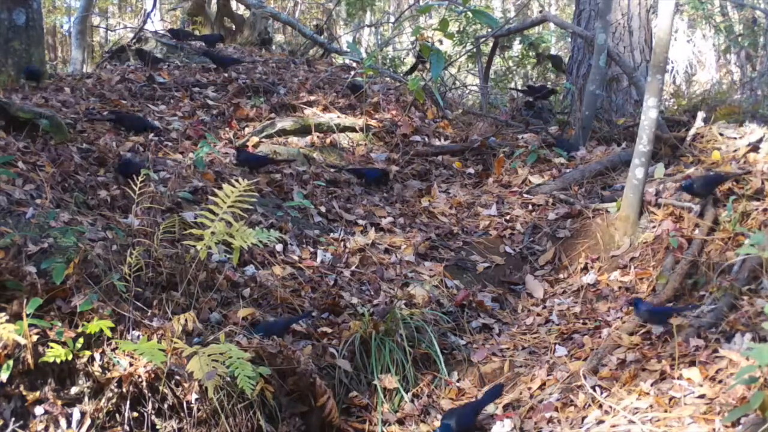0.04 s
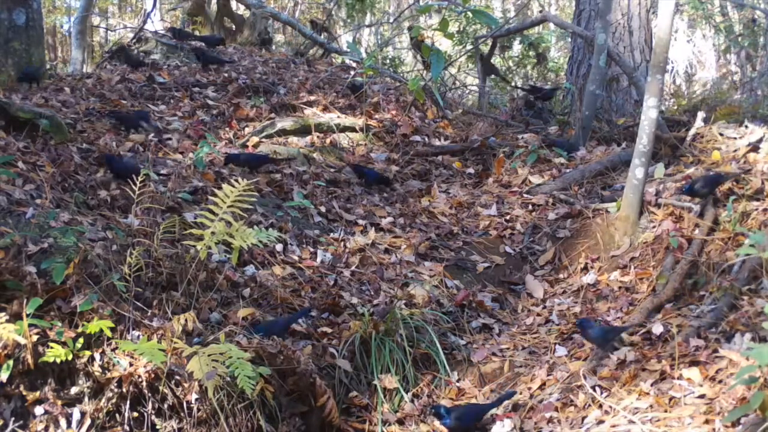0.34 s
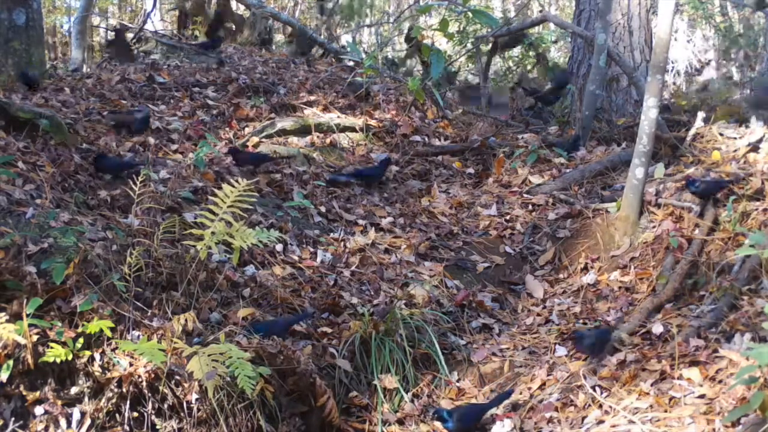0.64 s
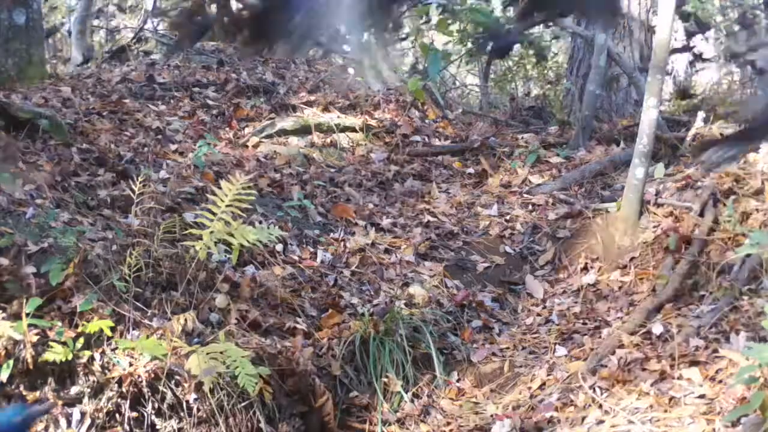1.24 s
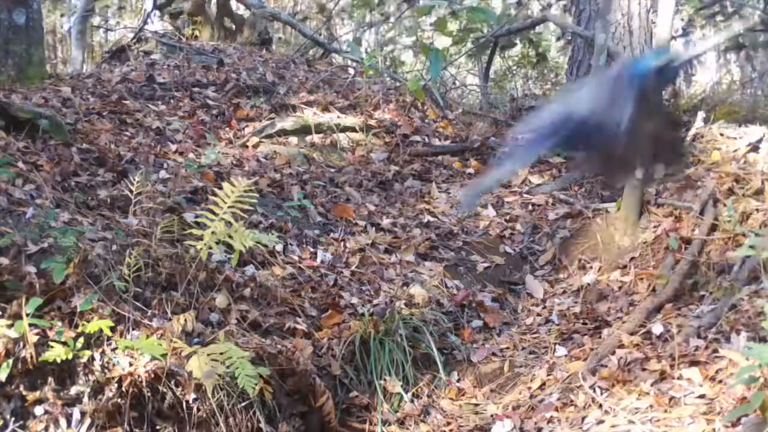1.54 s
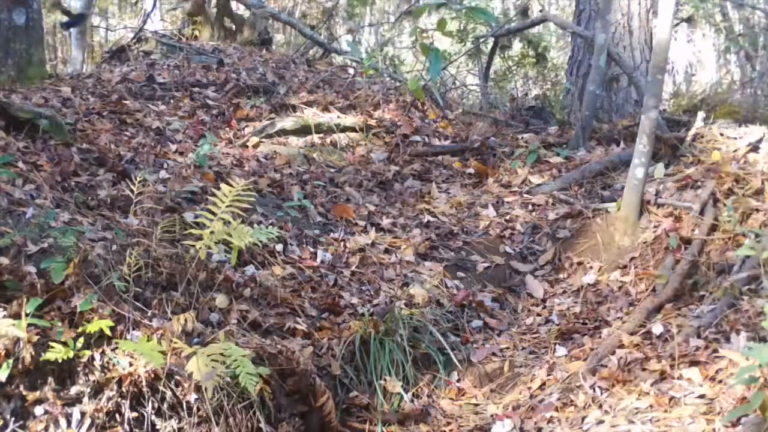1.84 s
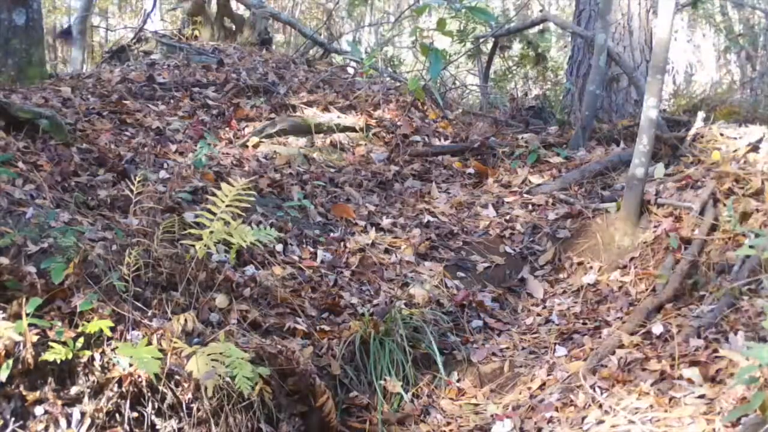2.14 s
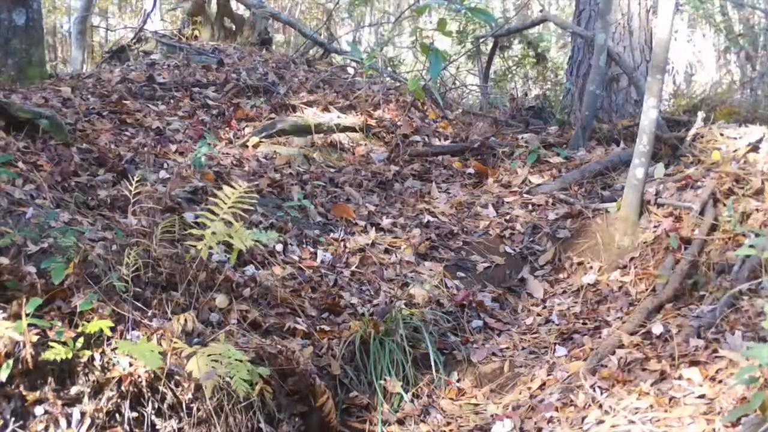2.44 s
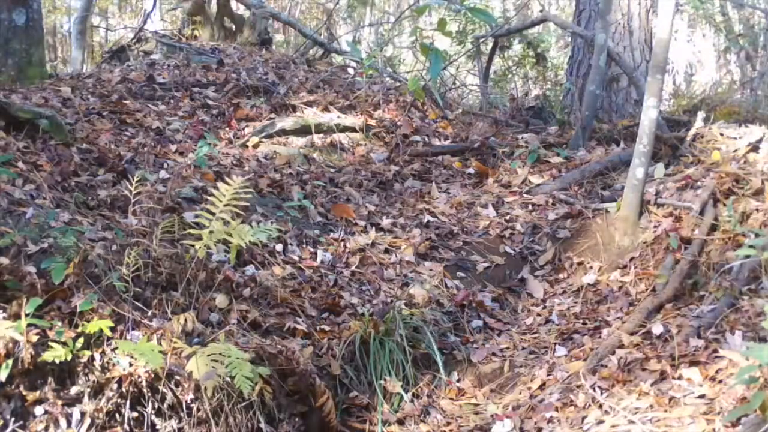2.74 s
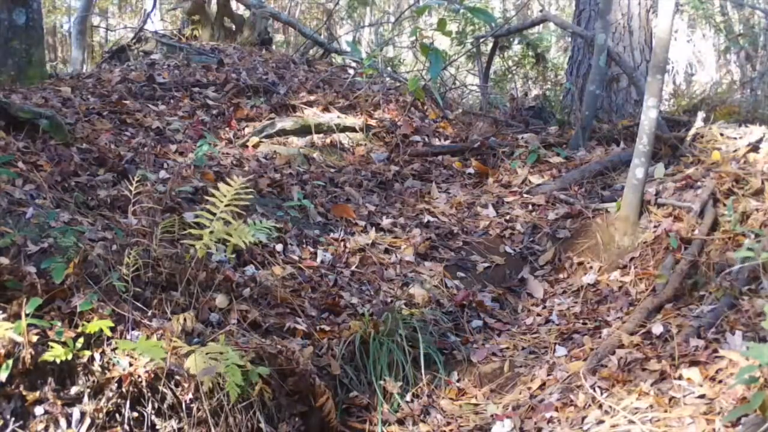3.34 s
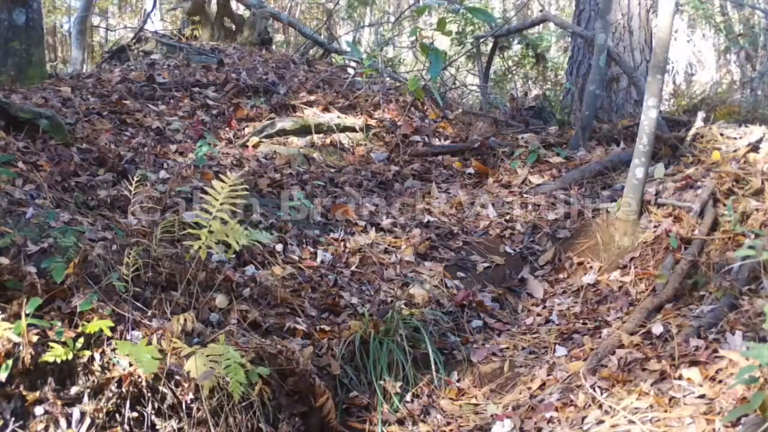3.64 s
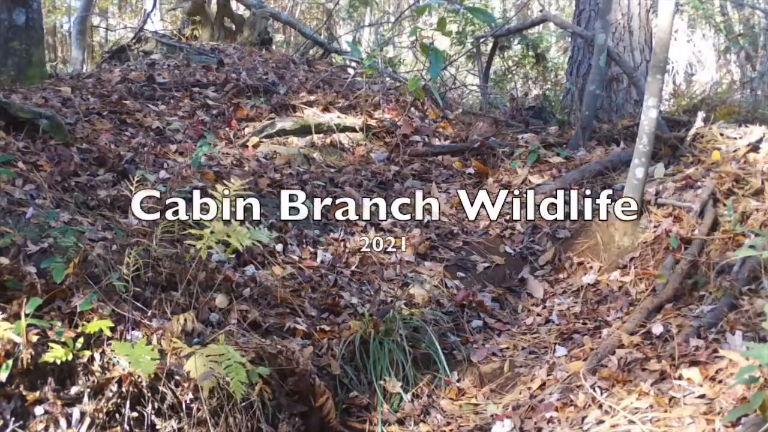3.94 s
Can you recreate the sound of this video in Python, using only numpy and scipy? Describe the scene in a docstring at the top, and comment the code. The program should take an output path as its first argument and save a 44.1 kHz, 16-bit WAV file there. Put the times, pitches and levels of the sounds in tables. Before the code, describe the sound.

A flock of birds rustles through dry leaves, then takes off in a flurry of wingbeats.

```python
"""Dry leaves rustle and crunch under a foraging flock of grackles, which then takes off all at once.
The rustle is thousands of tiny leaf cracks a second, swelling into a flurry as the birds spring up.
Wingbeats pulse the air into a whirr and a swish, a few thump past close by, and the flock recedes
into the trees. Thin whistles and two harsh chucks cut through; the wooded slope adds a short tail
to calls, crunches and ticks, over a bed of still air. Heard in mono."""
import sys
import numpy as np
from scipy import signal
from scipy.fft import rfft, irfft
from scipy.io import wavfile

SR = 44100
rng = np.random.default_rng(int(sys.argv[2]) if len(sys.argv) > 2 else 0)


def wav_out(sig):
    """Save sig, one row per channel (or a flat mono array), as 16-bit PCM at SR to the path in sys.argv[1]."""
    wavfile.write(sys.argv[1], SR, np.round(np.clip(np.atleast_2d(sig).T, -1, 1) * 32767).astype(np.int16))


N = 176400
TIME = np.arange(N) / SR

# stirring of the leaf litter: time_s, relative_db
RUSTLE_FADER = [(0, -38), (.4, -38.5), (.5, -36), (.64, -35.5), (.725, -37.5), (.9, -33.5), (1.08, -30),
                (1.14, -33.5), (1.36, -34.5), (1.42, -36.5), (1.65, -40.5), (1.85, -39), (2.05, -44),
                (2.45, -44), (2.7, -43), (3.1, -46), (3.6, -44), (3.75, -47.5), (4, -47)]
# tone of dry leaves: frequency_hz, gain_db
RUSTLE_EQ = [(900, -29), (2000, -22.5), (3300, -9.5), (3950, -11), (4500, -7), (5250, 0), (5750, 2),
             (7200, -5.5), (9000, -11), (11300, -18.5), (13500, -30), (15700, -36)]
# broader crackle of flung leaves: frequency_hz, gain_db
FLURRY_EQ = [(1200, -31), (2300, -14), (3100, -8), (4000, -1.5), (5200, -2), (6800, 3.5), (9000, -6),
             (11500, -12), (13500, -20.5), (15700, -27)]
# single leaves crunched or slapped by a wing: peak_s, relative_db, decay_s, pitch_hz
CRUNCH_CUES = [(.197, -39, .004, 8000), (0.46, -34, 0.0044, 5600), (0.467, -45, .003, 12900),
               (.509, -32, 0.0068, 5570), (0.642, -33, .004, 6200), (0.691, -34, 0.0043, 6200),
               (0.749, -31, 0.0026, 5730), (0.76, -40, 0.0087, 3200), (.763, -29.5, 0.0057, 5960),
               (.775, -34, 0.0035, 9600), (1.093, -26.5, 0.0075, 4700), (1.103, -18.5, 0.0024, 3930),
               (1.107, -25, 0.0059, 6700), (1.173, -28.5, 0.0052, 6300), (1.202, -28.5, .004, 4900),
               (1.366, -28, .004, 6000), (1.463, -38, 0.0027, 6250), (1.51, -32.5, .004, 6260),
               (1.911, -37, .005, 6200), (1.952, -38, .002, 5600), (2.139, -39, .004, 6200),
               (2.306, -36, 0.0054, 5350), (2.354, -39, .003, 6900), (2.595, -39, .003, 6150),
               (2.614, -40, .004, 5600), (2.705, -39, 0.0035, 5600), (2.787, -32.5, 0.0049, 5970),
               (2.79, -42, .004, 3450), (3.015, -40, .003, 6700), (3.515, -37, .003, 5640),
               (3.554, -40, .003, 6200)]
# ticking of the nearest leaves, fading as the birds leave: time_s, level_db
TICK_FADER = [(0, -51.5), (.65, -51), (.95, -49.5), (1.3, -48.5), (1.7, -53.5), (2.4, -56.5), (4, -68)]
# resonances of those leaves: pitch_hz, gain_db
LEAF_MODES = [(3400, -6), (4200, -4), (5500, 5), (6200, 4.5), (7000, 1.5), (7900, -1.5), (9000, -3.5),
              (10200, -6.5), (11600, -16), (13200, -15)]
# whirr of the flock's wings: time_s, relative_db
WHIRR_FADER = [(0, -58), (0.18, -60), (0.32, -49.5), (0.45, -53), (0.62, -49), (0.8, -52), (1.08, -40),
               (1.3, -43.5), (1.7, -49.5), (1.95, -49.5), (2.2, -49), (2.5, -53.5), (2.8, -47.5),
               (3.05, -53), (3.6, -52.7), (4, -56.5)]
# low body of the wingbeats: frequency_hz, gain_db
WHIRR_EQ = [(20, -9.5), (45, 0.5), (90, -6), (180, -12), (350, -19), (700, -32.5), (1500, -48)]
# feather swish, lingering as the flock settles in the trees: time_s, relative_db
SWISH_FADER = [(0, -67), (.55, -78), (.78, -55.5), (.95, -50.5), (1.12, -47), (1.3, -50), (1.6, -53.5),
               (2.2, -54.5), (2.8, -55), (3.6, -56.5), (4, -59)]
# tone of feathers: frequency_hz, gain_db
SWISH_EQ = [(150, -10), (500, 1.5), (1200, 0.5), (2200, -6), (3600, -2.5), (6000, -0.5), (12000, -15)]
# air pushed by wings passing close: peak_s, peak_db, pitch_hz
DOWNSTROKE_CUES = [(.678, -36.5, 85), (1.11, -39, 55), (1.15, -29.5, 42), (1.217, -28.5, 45),
                   (1.324, -44, 60), (1.435, -45, 55), (1.512, -35, 65), (2.088, -35.5, 49)]
# thin whistles: start_s, length_s, level_db, start_hz, middle_hz, end_hz
WHISTLE_CUES = [(.025, 0.13, -48, 3490, 3500, 3580), (0.611, 0.091, -51.5, 3000, 3374, 3490),
                (.925, 0.153, -45, 3220, 3445, 3350), (3.81, .2, -59.5, 3690, 3860, 3860)]
# harsh chucks: start_s, length_s, rasp_level_db, rasp_pitch_hz
CHUCK_CUES = [(0.622, 0.056, -52.5, 3174), (1.809, 0.0344, -42.5, 3154)]
# still woodland air: frequency_hz, gain_db
AIR_EQ = [(20, 2.5), (42, -3), (100, -11), (300, -21.5), (900, -26), (2500, -23), (6000, -24), (11000, -42),
          (15500, -57)]

CRACKS_PER_S = 5500


def leaf_rustle(bands=6, trim_db=-3):
    """Clumps of tiny leaf cracks in overlapping pitch bands; more stirring makes more of them."""
    gain = fader(RUSTLE_FADER)
    activity = gain / gain.mean()
    band_position = np.interp(np.log(bin_hz()), np.log([2500, 13000]), [0, bands - 1])
    spectrum = 0
    for band in range(bands):
        band_gain = np.sqrt(np.clip(1 - abs(band_position - band), 0, 1))
        spectrum = spectrum + rfft(clicks(CRACKS_PER_S * activity)) * band_gain
    cracks = irfft(spectrum, N) / np.sqrt(activity)  # density sets texture, the fader sets level
    clumping = from_db(.68 * drift(19))
    return from_db(trim_db) * gain * equalise(cracks * clumping, RUSTLE_EQ)


def leaf_flurry(hold_start_s=.92, hold_end_s=1.037, hold_db=-35.5):
    """Leaves flung up at take-off: a dense crackle that swells, holds and dies away."""
    swell_db = -49 * np.maximum(hold_start_s - TIME, 0)
    fade_db = -22.5 * np.maximum(TIME - hold_end_s, 0)
    cracks = clicks(CRACKS_PER_S) * from_db(2.3 * drift(55))
    return from_db(hold_db + swell_db + fade_db) * equalise(cracks, FLURRY_EQ)


def leaf_crunches(width_oct=.13, attack_ratio=.72, trim_db=-1.5):
    """One leaf gives way in a short burst of cracks around its own pitch."""
    out = np.zeros(N)
    for peak_s, db, decay_s, hz in CRUNCH_CUES:
        resonance = (1 + (np.log2(bin_hz() / hz) / width_oct) ** 2) ** -.68
        cracks = irfft(rfft(clicks(CRACKS_PER_S)) * resonance, N)
        cracks = equalise(cracks, [(500, -7), (2500, 1), (9000, 2), (16000, -11)])
        envelope = np.exp(-np.maximum(TIME - peak_s, (peak_s - TIME) / attack_ratio) / decay_s)
        burst = cracks * envelope
        makeup_gain = np.sqrt(np.sum(envelope ** 2) / (np.sum(burst ** 2) + 1e-20))
        out += from_db(db + trim_db) * burst * makeup_gain
    return out


def leaf_ticks(snaps_per_s=77, decay_cycles=5.9):
    """Sparse, bright snaps up close; each rings the leaf's resonances in a blend of its own."""
    snaps = clicks(snaps_per_s)
    out = np.zeros(N)
    for hz, db in LEAF_MODES:
        decay = np.exp(-hz / (decay_cycles * SR))
        angle = 2 * np.pi * hz / SR
        strikes = snaps * rng.uniform(-1.02, 1, N) + 1e-18
        ring = signal.lfilter([0, np.sin(angle)], [1, -2 * decay * np.cos(angle), decay ** 2], strikes)
        out += from_db(db) * ring
    return fader(TICK_FADER) * unit_rms(out)


def flock_wings(birds=6, typical_beat_hz=11.5, whirr_trim_db=2, swish_trim_db=1):
    """Each bird pulses the air at its own beat and changing distance: low whirr, light feather swish."""
    power = 0
    for _ in range(birds):
        cycles = typical_beat_hz * rng.uniform(.75, 1.25) * TIME + rng.random()
        power = power + np.exp(np.cos(2 * np.pi * cycles) + .5 * drift(1.4))
    beats = unit_rms(np.sqrt(power) * rng.standard_normal(N))
    feathers = beats * rng.choice([-1, 1], N)  # same pulse, fresh noise
    whirr = fader(WHIRR_FADER) * equalise(beats, WHIRR_EQ)
    swish = fader(SWISH_FADER) * equalise(feathers, SWISH_EQ)
    return from_db(whirr_trim_db) * whirr + from_db(swish_trim_db) * swish


def close_wings():
    """Each near downstroke is a soft thump: one push of air between two pressure dips."""
    out = np.zeros(N)
    for peak_s, db, hz in DOWNSTROKE_CUES:
        phase_squared = (np.pi * hz * (TIME - peak_s)) ** 2
        out += from_db(db) * (1 - 2 * phase_squared) * np.exp(-phase_squared)
    return out


def whistles(waver=.00298, flutter_db=1.1):
    """Nearly pure bird notes, wavering slightly along a curve through three pitches."""
    out = np.zeros(N)
    for start_s, length_s, db, *pitches in WHISTLE_CUES:
        progress = np.clip((TIME - start_s) / length_s, 0, 1)
        hz = np.polyval(np.polyfit([0, .5, 1], pitches, 2), progress)
        tone = np.sqrt(2) * sine(hz * (1 + waver * drift(106)))
        out += from_db(db + flutter_db * drift(40)) * gate(start_s, length_s, ramp_s=.01) * tone
    return out


def chucks(rise=.12, shake_hz=324, clear_ratio=1.1, clear_db=-8.5):
    """Short rising calls: a fast pitch shake makes the rasp, and a clear tone rides on top."""
    out = np.zeros(N)
    for start_s, length_s, db, hz in CHUCK_CUES:
        glide = 1 + rise * (np.clip((TIME - start_s) / length_s, 0, 1) - .5)
        shake = .15 * np.sin(2 * np.pi * shake_hz * TIME) + .1 * drift(1490)
        rasp = sine(hz * (glide + shake)) * from_db(2.6 * drift(500))
        rasp = equalise(rasp, [(1500, 0), (3000, -1.5), (3600, .5), (3950, -14)])
        clear = from_db(clear_db) * np.sqrt(2) * sine(hz * clear_ratio * glide)
        out += from_db(db) * gate(start_s, length_s, ramp_s=.016) * (rasp + clear)
    return out


def woodland_reverb(x, t60_s=.52, predelay_s=.008, wet_db=-12.5):
    """Trunks and slope scatter the sound, adding a short diffuse tail."""
    tail = rng.standard_normal(N) * from_db(-60 * TIME / t60_s) * (TIME > predelay_s)
    tail /= np.sqrt(np.sum(tail ** 2))
    return x + from_db(wet_db) * signal.fftconvolve(x, tail)[:N]


def woodland_air(level_db=-55.5):
    """Still air: a steady bed of low rumble and faint hiss."""
    return from_db(level_db) * equalise(rng.standard_normal(N), AIR_EQ)


def from_db(db):
    """Decibels to gain."""
    return 10 ** (np.asarray(db) / 20)


def unit_rms(x):
    """Scale to unit rms."""
    return x / np.sqrt(np.mean(x ** 2) + 1e-20)


def fader(points):
    """Gain ride through (time_s, level_db) points."""
    return from_db(np.interp(TIME, *np.transpose(points)))


def bin_hz():
    """Frequency of every spectral bin, at least 1 Hz."""
    return np.maximum(np.arange(N // 2 + 1) * SR / N, 1)


def equalise(x, points):
    """EQ through (frequency_hz, gain_db) points with a 20 Hz low cut; unit rms."""
    hz, db = np.transpose(points)
    low_cut = 1 / np.sqrt(1 + (20 / bin_hz()) ** 4)
    curve = from_db(np.interp(np.log(bin_hz()), np.log(hz), db))
    return unit_rms(irfft(rfft(x) * low_cut * curve, N))


def drift(rate_hz):
    """Random modulation, mostly slower than rate_hz; unit rms."""
    return unit_rms(irfft(rfft(rng.standard_normal(N)) / (1 + (bin_hz() / rate_hz) ** 2), N))


def clicks(per_s, spread_db=2.5):
    """Random clicks of uneven size."""
    sizes = from_db(spread_db * np.minimum(rng.exponential(1, N), 5))
    return sizes * rng.choice([-1, 1], N) * (rng.random(N) < per_s / SR)


def sine(hz):
    """Oscillator following a pitch curve."""
    return np.sin(2 * np.pi * np.cumsum(hz) / SR)


def gate(start_s, length_s, ramp_s):
    """Attack, hold and release."""
    return np.clip(np.minimum(TIME - start_s, start_s + length_s - TIME) / ramp_s + .5, 0, 1)


def scene():
    """Leaves, wings, calls and air, alike in both channels."""
    air = woodland_air()
    accents = woodland_reverb(leaf_crunches() + leaf_ticks() + whistles() + chucks())
    mono = leaf_rustle() + leaf_flurry() + flock_wings() + close_wings() + accents + air
    return np.array([mono, mono])


def record(dry, cutoff_hz=15660):
    """A steep high cut on the whole mix."""
    return irfft(rfft(dry) / np.sqrt(1 + (bin_hz() / cutoff_hz) ** 600), N)


dry = scene()
out = record(dry)
wav_out(out)
```